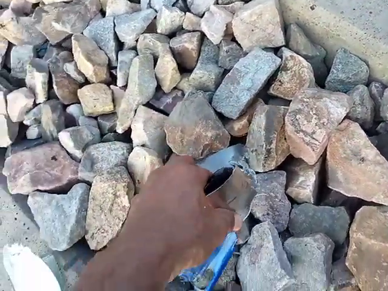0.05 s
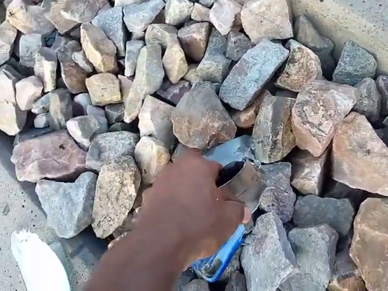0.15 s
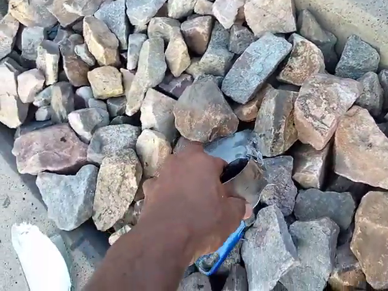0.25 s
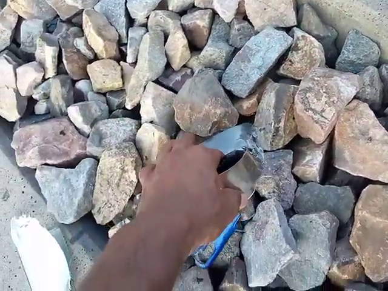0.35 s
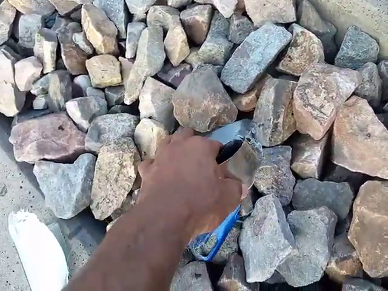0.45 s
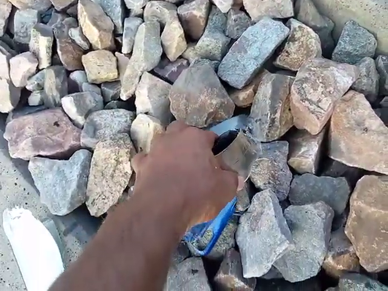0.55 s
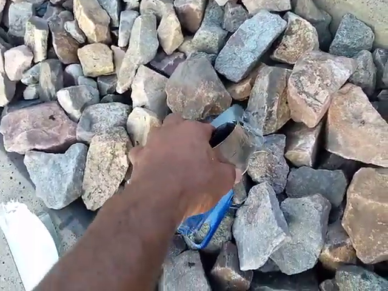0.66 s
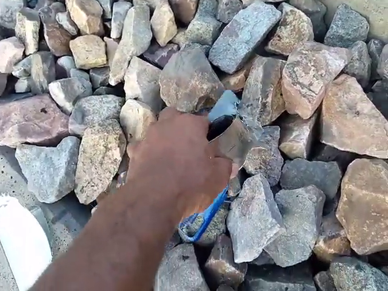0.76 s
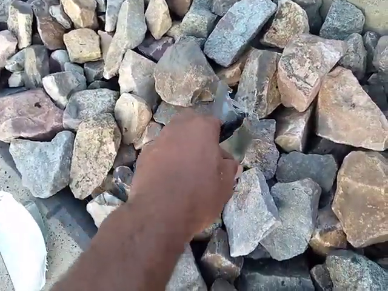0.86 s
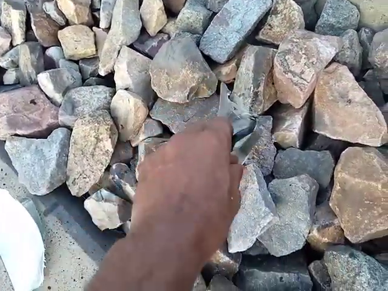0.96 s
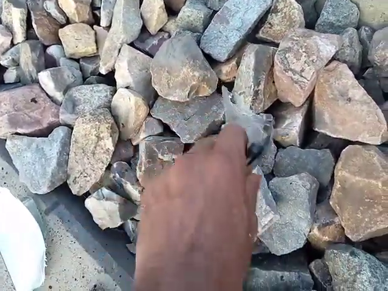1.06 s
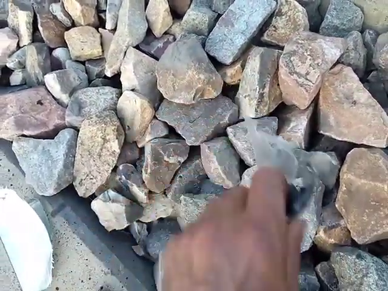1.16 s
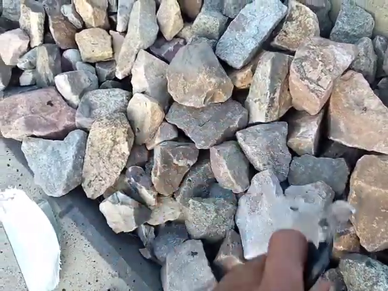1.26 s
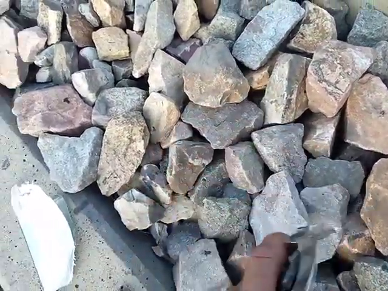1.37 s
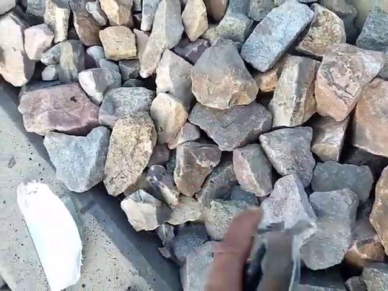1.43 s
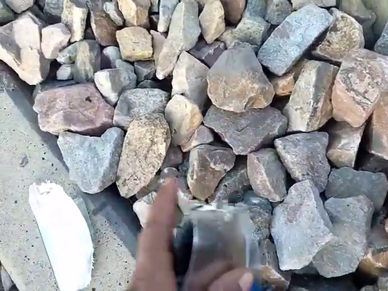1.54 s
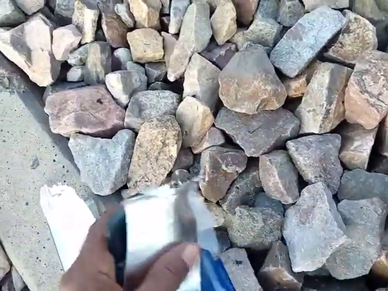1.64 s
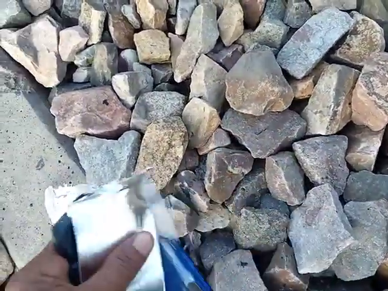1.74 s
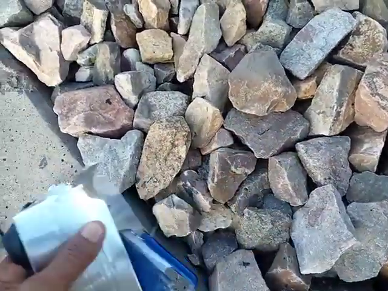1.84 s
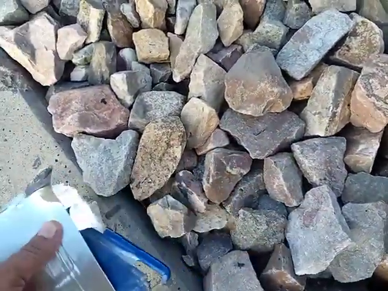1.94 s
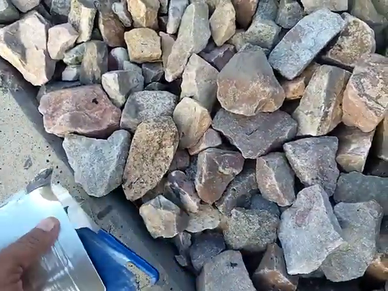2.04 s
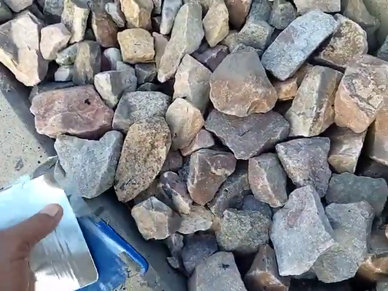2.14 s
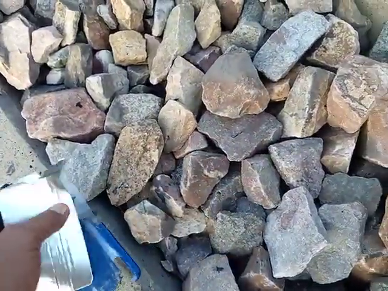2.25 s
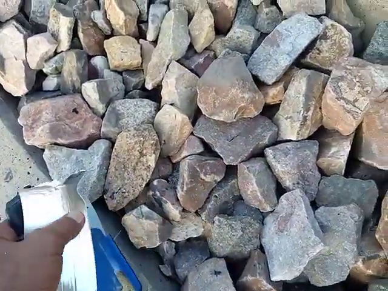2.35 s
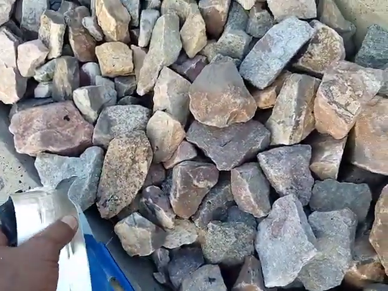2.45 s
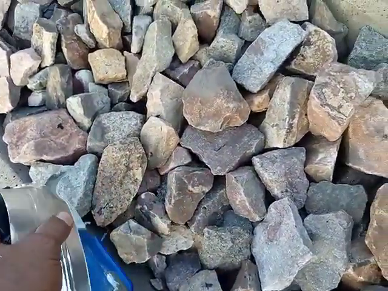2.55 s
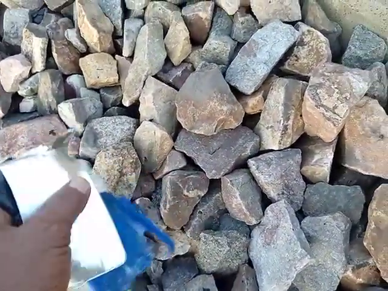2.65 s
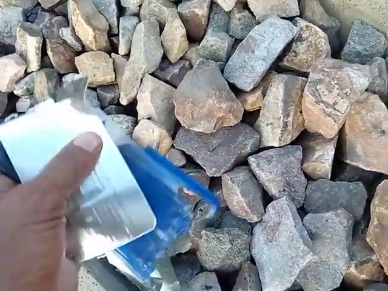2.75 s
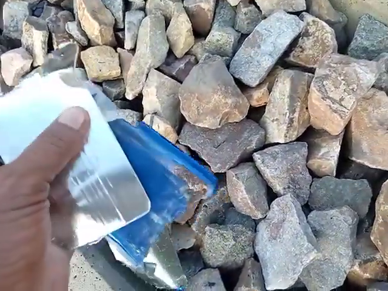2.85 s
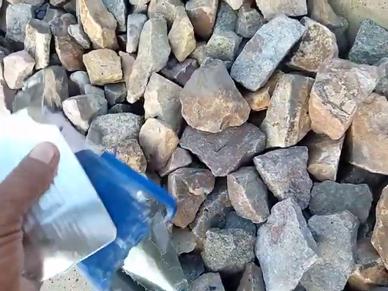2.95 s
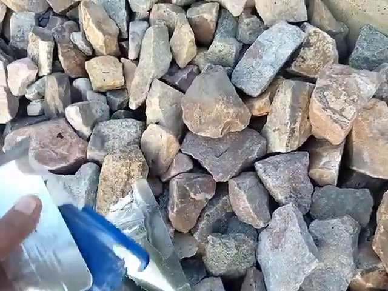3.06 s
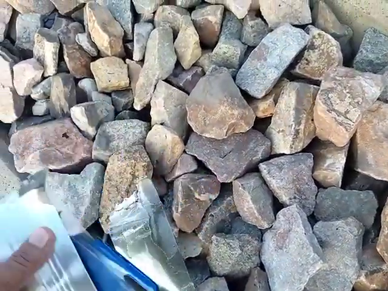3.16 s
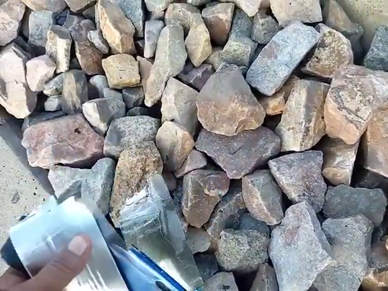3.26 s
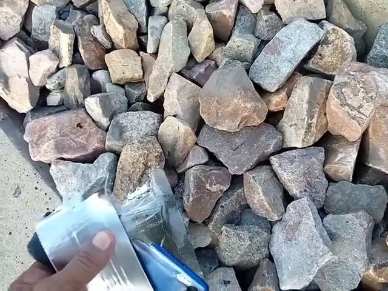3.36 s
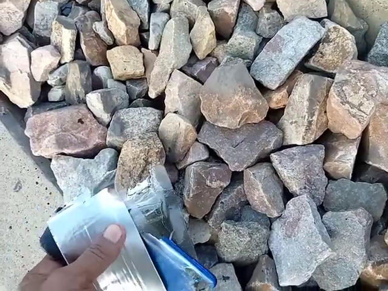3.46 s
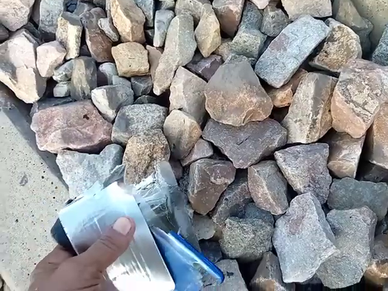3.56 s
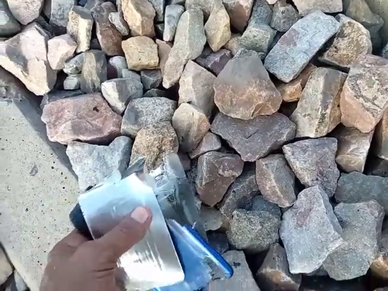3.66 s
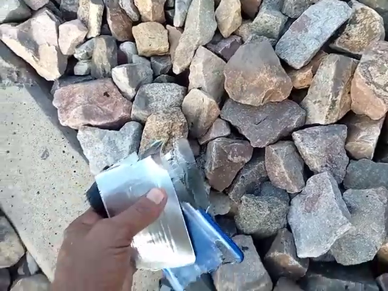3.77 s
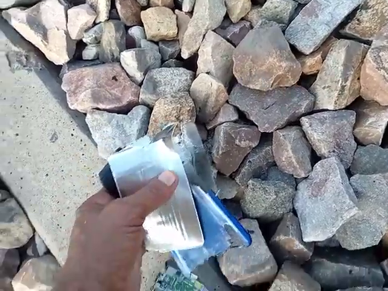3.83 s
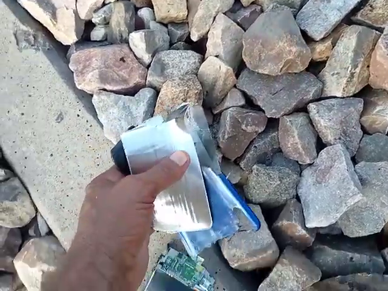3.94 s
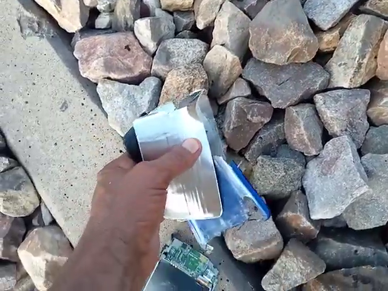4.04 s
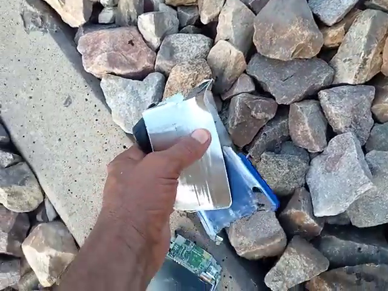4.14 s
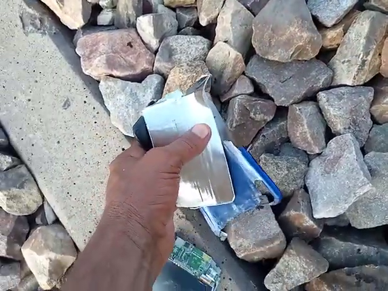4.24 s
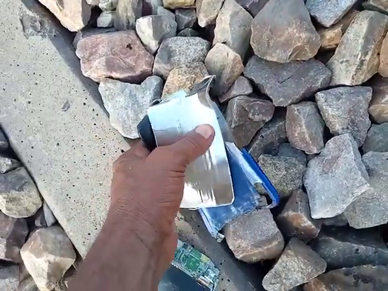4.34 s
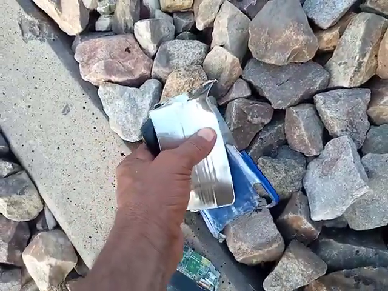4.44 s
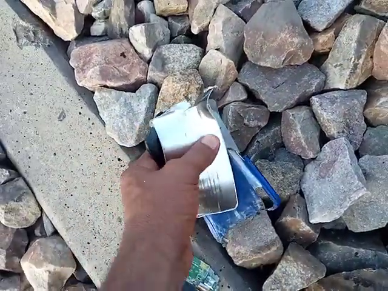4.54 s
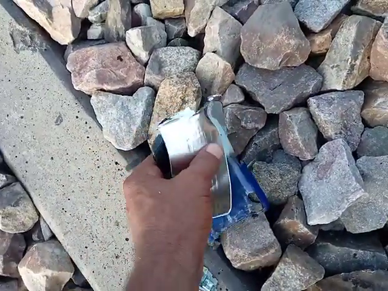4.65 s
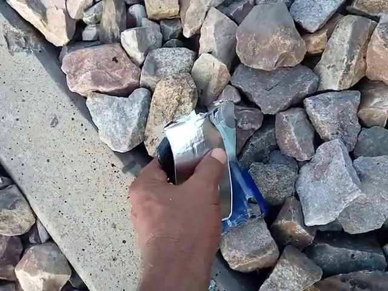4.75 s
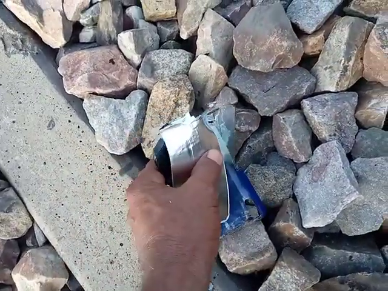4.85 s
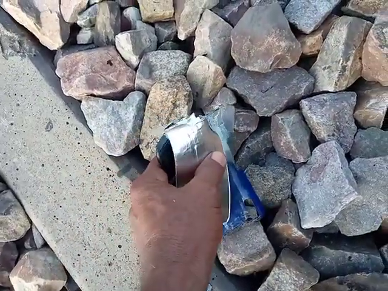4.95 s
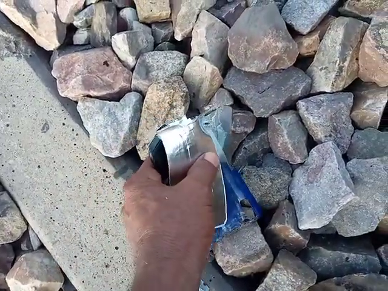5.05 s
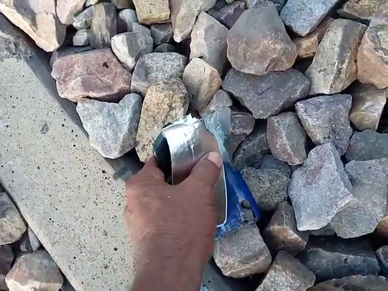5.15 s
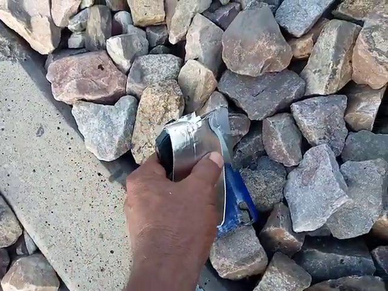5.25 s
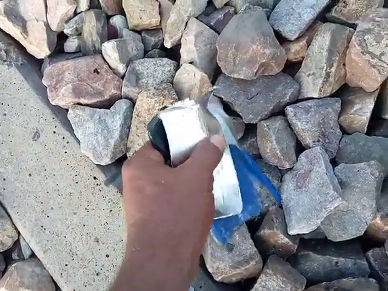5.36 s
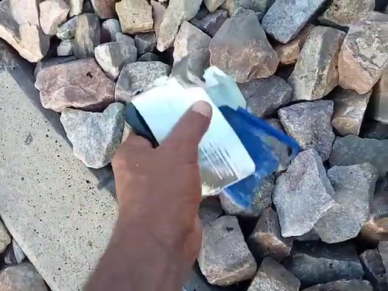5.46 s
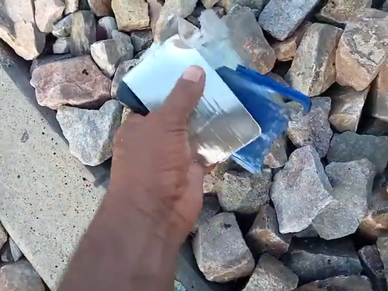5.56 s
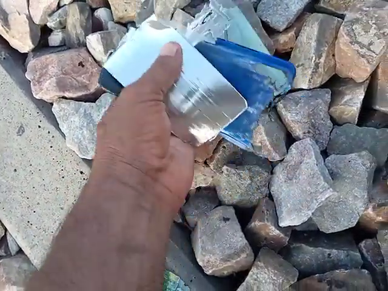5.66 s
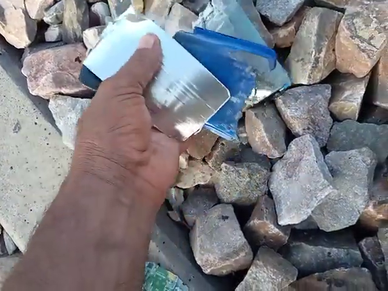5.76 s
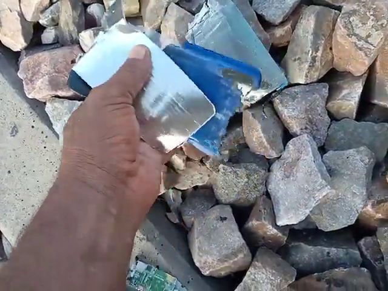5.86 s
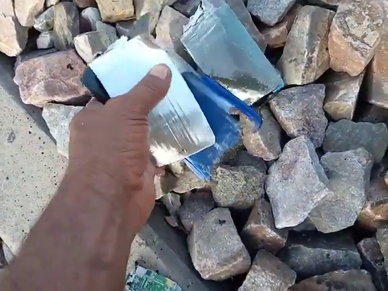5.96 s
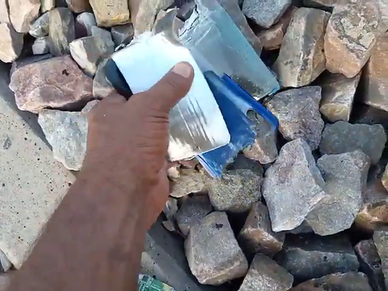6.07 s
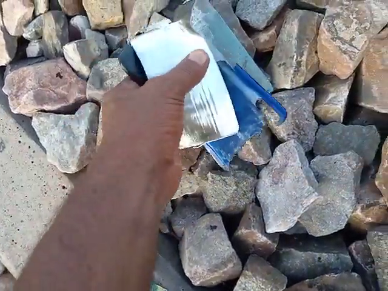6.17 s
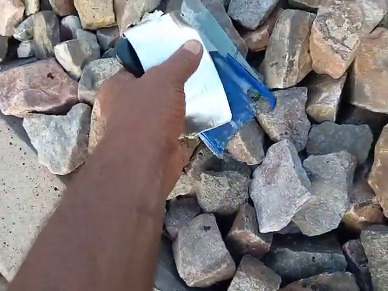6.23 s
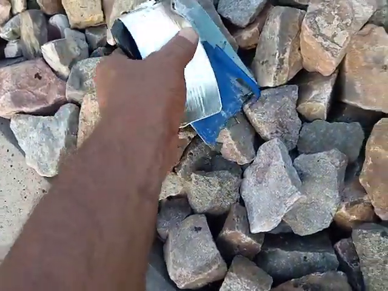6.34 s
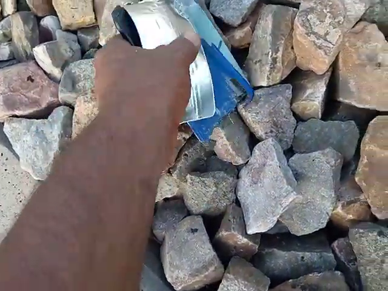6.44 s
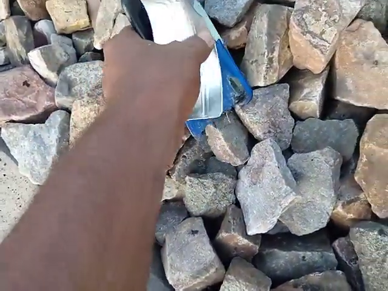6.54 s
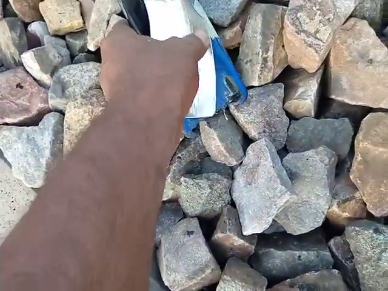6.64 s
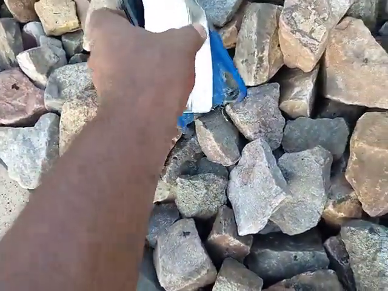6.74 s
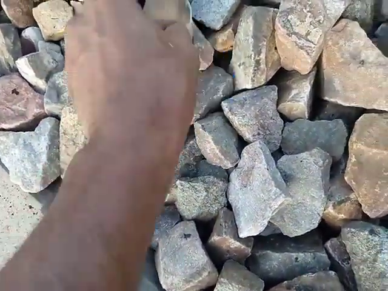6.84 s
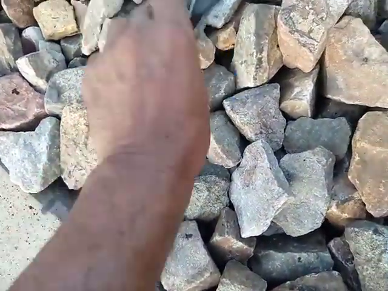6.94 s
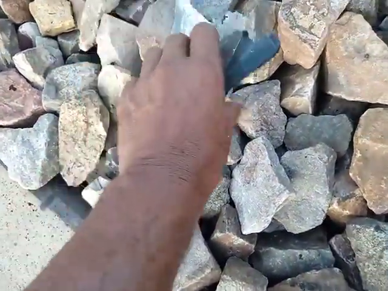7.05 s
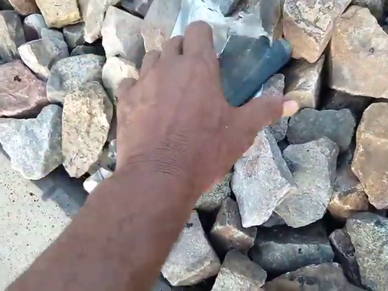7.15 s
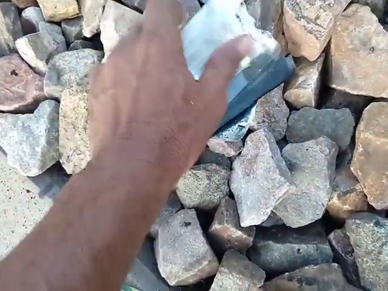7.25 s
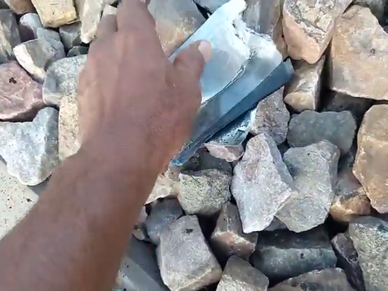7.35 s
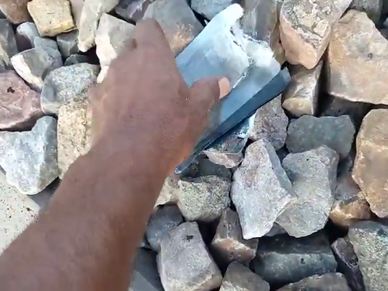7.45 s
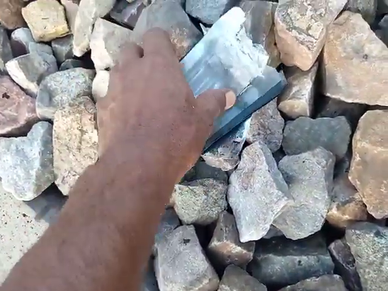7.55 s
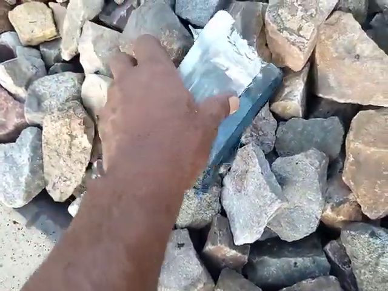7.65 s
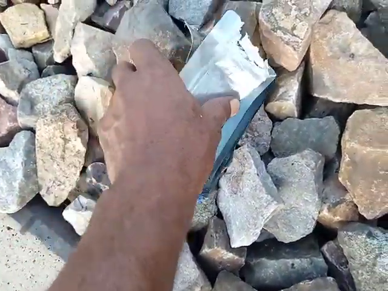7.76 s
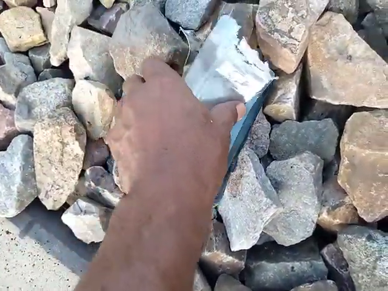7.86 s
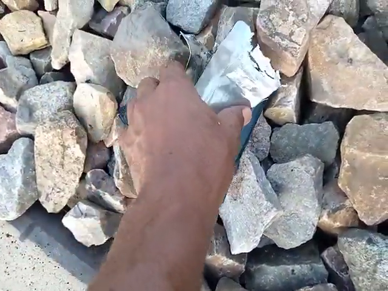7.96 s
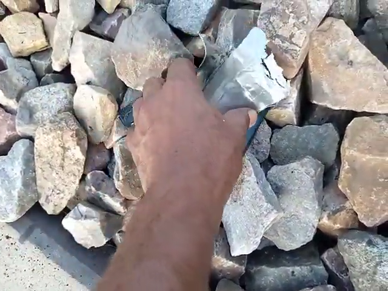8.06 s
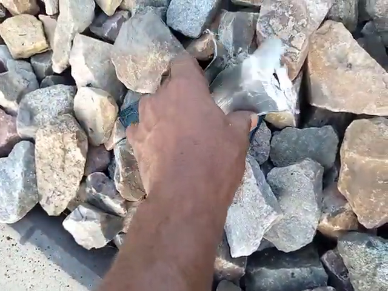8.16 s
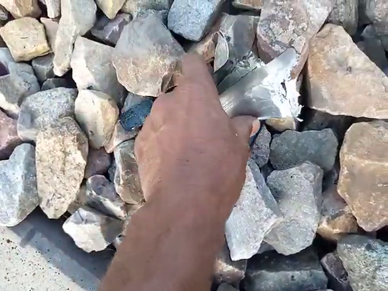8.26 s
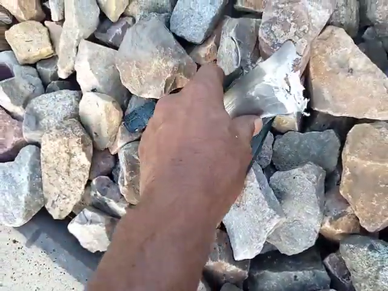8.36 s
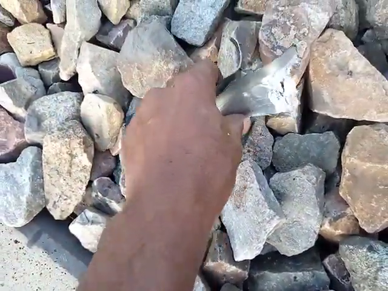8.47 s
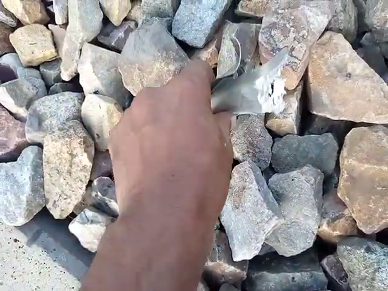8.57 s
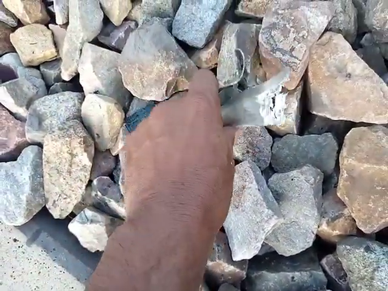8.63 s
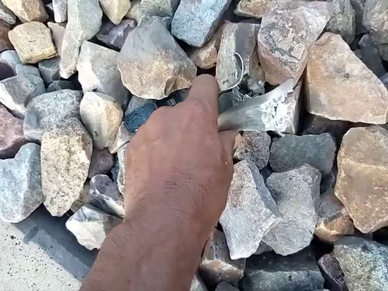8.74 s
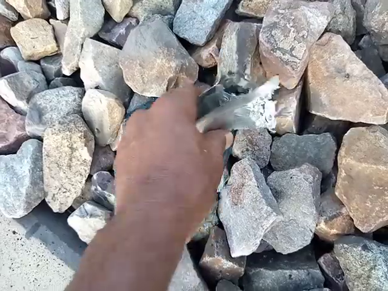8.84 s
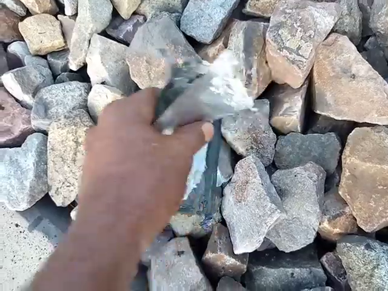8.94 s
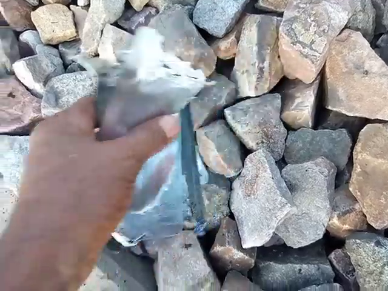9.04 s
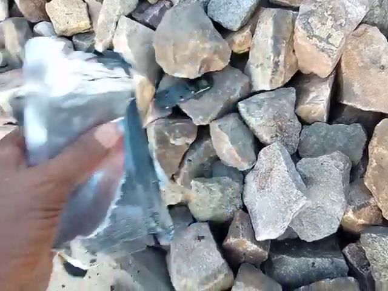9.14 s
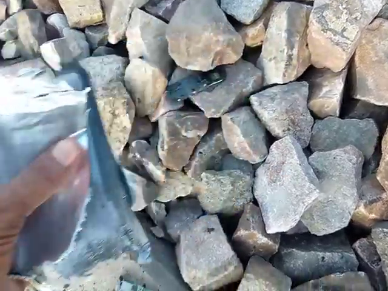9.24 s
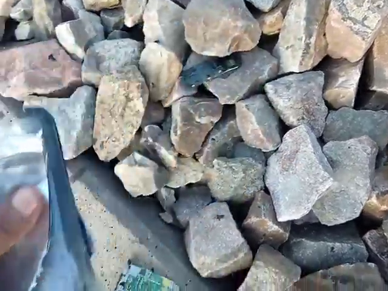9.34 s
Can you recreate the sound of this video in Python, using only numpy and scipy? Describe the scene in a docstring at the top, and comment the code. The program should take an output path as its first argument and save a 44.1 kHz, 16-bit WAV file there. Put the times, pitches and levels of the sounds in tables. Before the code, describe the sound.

Very close to the microphone, a hand picks crushed phone pieces from track stones. Sharp metallic clicks and short ringing scrapes start sparsely, cluster around two and a half seconds, then thin out with a few dull thuds. After seven seconds crumpled foil crackles brighter and busier. Outdoors behind it, insects hiss and buzz, a hoarse bird calls far off, and light wind rumbles.

```python
"""Beside a railway track: a hand gathers a crushed phone from the ballast, close to the microphone.
Its casing, then a crumpled foil sheet, click and scrape: stick-slip impulses ring resonant metal modes.
Low thuds are decaying sines; faint ticks are small versions of the clicks.
Behind them a chorus of insects hisses as banded noise, and two nearer kinds buzz as pulsed, raspy tones.
Farther off a bird calls in fluttering noise, over open air and wind rumbling on the microphone."""
import sys
import numpy as np
from scipy import signal
from scipy.fft import rfft, irfft, next_fast_len
from scipy.io import wavfile
from scipy.ndimage import uniform_filter1d, map_coordinates

SR = 44100
rng = np.random.default_rng(int(sys.argv[2]) if len(sys.argv) > 2 else 0)


def output_pcm(signal):
    """Save a mono or channel-first signal as 16-bit PCM at the path in sys.argv[1].

    Samples are clipped to [-1, 1] before scaling.
    """
    pcm = np.clip(np.atleast_2d(signal).T, -1, 1) * 32767
    wavfile.write(sys.argv[1], SR, np.round(pcm).astype(np.int16))


N = 414540
TIME = np.arange(N) / SR
FOIL_FROM_S = 7.0  # the hand moves from the casing to the foil
LEAD_IN_S = 0.025  # time kept for the graze before each snap
BODY_BELOW_HZ = 1370  # a piece pressed on stone gains body below this
# force: firm contacts are brighter, light ones leave a purer ring
FIRM_DB, TREBLE_PER_DB = -26.5, 1.3


def amp(db):
    """Decibels to gain."""
    return 10 ** (np.asarray(db) / 20)


def unit(x):
    """Scale to rms 1."""
    return x / np.sqrt(np.mean(x ** 2) + 1e-20)


def along(points, hz):
    """Gain of (Hz, dB) points, joined on a log frequency axis."""
    f, db = np.transpose(points)
    return amp(np.interp(np.log(hz + 1), np.log(f + 1), db))


def curves(rows):
    """One value per sample for each column after the time."""
    s, *columns = np.transpose(rows)
    return [np.interp(TIME, s, column) for column in columns]


def gate(start, end, fade):
    """1 between two times, with soft edges."""
    fade_in = np.clip((TIME - start) / fade, 0, 1)
    fade_out = np.clip((end - TIME) / fade, 0, 1)
    return fade_in * fade_out


def wobble(rate):
    """A smooth random curve, rate knots a second."""
    knots = rng.standard_normal(int(N * rate / SR) + 4)
    return map_coordinates(knots, [TIME * rate / SR])


def filtered(x, response):
    """x times a response of frequency."""
    m = next_fast_len(len(x) + 8192)
    spectrum = rfft(x, m) * response(np.fft.rfftfreq(m, 1 / SR))
    return irfft(spectrum, m)[:len(x)]


def coloured(x, gain, size=2048):
    """Causal (minimum-phase) colouring: nothing sounds before the contact."""
    log_gain = np.log(np.maximum(gain(np.fft.rfftfreq(size, 1 / SR)), 1e-6))
    cepstrum = irfft(log_gain)
    # folding the cepstrum onto positive time makes the response causal
    cepstrum[1:size // 2] *= 2
    cepstrum[size // 2 + 1:] = 0
    impulse_response = irfft(np.exp(rfft(cepstrum)))
    return signal.oaconvolve(x, impulse_response)[:len(x)]


def below(hz, corner_hz, order=4):
    """Share of a frequency that lies under a soft corner."""
    return 1 / (1 + (hz / corner_hz) ** order)


def resonances(modes, hz):
    """Power response of (Hz, width Hz, dB) modes."""
    f, width, db = np.transpose(modes)[:, :, None]
    return np.sum(amp(db) ** 2 / (1 + (2 * (hz - f) / width) ** 2), axis=0)


def noise(gain):
    """Noise of rms 1 with a given colour."""
    return unit(filtered(rng.standard_normal(N), gain))


def slips(size, rate, spread_db):
    """Tiny stick-slip impulses at random times, a few much bigger than the rest."""
    happens = rng.random(size) < rate / SR
    sign = rng.choice([-1, 1], size)
    strength = amp(spread_db * np.minimum(rng.exponential(size=size), 4))
    return unit(happens * sign * strength)


def add(track, sound, s):
    """Mix a sound in at a time."""
    part = track[max(round(s * SR), 0):][:len(sound)]
    part += sound[:len(part)]


# colour of the open air around the track: f/Hz, relative level per Hz/dB
AIR_COLOUR = [(100, -7.5), (300, -12.5), (600, -16), (1000, -24), (2000, -14.5), (2700, -8.5), (3800, -18),
              (8000, -48.5), (15000, -51)]


def open_air():
    """Broad noise whose level drifts as the breeze comes and goes."""
    level_db = -74.5 + 3.5 * wobble(3)
    return amp(level_db) * noise(lambda hz: along(AIR_COLOUR, hz))


# colour of wind on the microphone: f/Hz, relative level per Hz/dB
RUMBLE_COLOUR = [(20, -43), (40, -11), (65, 3), (150, -1), (300, -28.5), (900, -62)]
# strength of that wind: t/s, level before the wind gain/dB
WIND = [(0.0, -73.5), (2.8, -78), (2.93, -68.5), (2.98, -80), (5.37, -73.5), (5.5, -67), (5.6, -87),
        (5.71, -60), (5.76, -77), (7.62, -76), (7.7, -63), (7.8, -78), (7.91, -70), (8.67, -77),
        (8.72, -69.5), (9.4, -75.5)]


def wind():
    """A light wind pushes on the microphone: low noise with uneven strength."""
    wind_gain_db = 1.25
    rumble = noise(lambda hz: along(RUMBLE_COLOUR, hz)) * amp(3.5 * wobble(15))
    return amp(curves(WIND)[0] + wind_gain_db) * unit(rumble)


# colour of the broad chorus: f/Hz, relative level per Hz/dB
CHORUS_COLOUR = [(3900, -42), (4300, -17.5), (4600, -3.5), (5100, -0.5), (5800, -2.5), (6100, -10.5),
                 (6500, -20), (7100, -31), (8000, -56)]
# background insects: t/s, broad chorus level before its gain/dB, shrill band level before its gain/dB
INSECTS = [(0.0, -68.5, -70), (2.01, -72, -73.5), (2.45, -66.5, -68.5), (2.64, -57, -55), (3.03, -67, -69),
           (5.4, -69, -72), (7.15, -67, -71), (7.41, -75, -73), (8.31, -75.5, -76.5), (8.7, -70.5, -84.5)]


def insect_chorus():
    """Two kinds of insects sing together: a broad hiss and a narrow, flickering shrill band."""
    chorus_gain_db, shrill_gain_db = 1.5, -1
    chorus_db, shrill_db = curves(INSECTS)
    chorus = amp(chorus_db + chorus_gain_db) * noise(lambda hz: along(CHORUS_COLOUR, hz))
    shrill_band = noise(lambda hz: below(np.abs(hz - 5650), 150, order=2))
    shrill = amp(shrill_db + shrill_gain_db + 3.7 * wobble(60)) * shrill_band
    return chorus + shrill


# resonant colour of the bird's throat: f/Hz, relative level per Hz/dB
CALL_COLOUR = [(2300, -55), (2700, -4.5), (2950, 10), (3450, -12), (3800, 1), (4400, -18.5), (5500, -65)]
# hoarse calls from a distance: t/s, length/s, level/dB
BIRD_CALLS = [(1.348, 0.16, -58), (3.708, 0.19, -53), (4.115, 0.278, -68.5), (6.21, 0.15, -56)]


def bird():
    """A distant bird: hoarse, fluttering noise shaped by a narrow throat resonance."""
    level = sum(amp(db) * gate(s, s + length, fade=0.045) for s, length, db in BIRD_CALLS)
    voice = noise(lambda hz: along(CALL_COLOUR, hz)) * amp(1.5 * wobble(150))
    return level * unit(voice)


# nearer insects: start t/s, end t/s, level/dB, tone f/Hz, mean pulse rate/Hz,
# pulse sharpness (exponent), rasp against the tone/dB
BUZZES = [(5.394, 7.253, -68.5, 5054, 92, 0.47, 1), (7.298, 8.566, -62, 5476, 51.8, 1.5, -1),
          (8.823, 9.42, -62.5, 5091, 78, 0.28, 2)]


def buzzes():
    """The songs of the nearer insects."""
    return sum(buzz(*row) for row in BUZZES)


def buzz(start, end, db, tone_hz, pulse_hz, sharpness, rasp_db):
    """A near insect: pulses at a wavering rate swell an unsteady tone and a rasp around it."""
    beat = np.cumsum(pulse_hz * (1 + 0.023 * wobble(5))) / SR
    pulses = np.abs(np.sin(np.pi * beat)) ** sharpness
    phase = 2 * np.pi * tone_hz * TIME + wobble(pulse_hz)
    rasp = noise(lambda hz: below(np.abs(hz - tone_hz), 180, order=2))
    song = pulses * (unit(np.sin(phase)) + amp(rasp_db) * rasp)
    return amp(db) * gate(start, end, fade=0.012) * unit(song)


# range in which the struck spot of a tick rings: lowest f/Hz, highest f/Hz
SPOT_HZ = (1106, 4040)


def ticks(count=70):
    """The loose pieces tick faintly against each other at random times."""
    weakest_db, range_db = -61.5, 9
    out = np.zeros(N)
    for s, force, spot in rng.random((count, 3)) * [N / SR, 1, 1]:
        ring_hz = np.interp(spot, [0, 1], SPOT_HZ)
        add(out, contact(s, weakest_db + range_db * force, 0, ring_hz), s)
    return out


# dull thuds as the thumb bends the casing: t/s, level/dB, f/Hz
THUDS = [(4.692, -48.5, 328), (4.742, -54, 400), (4.774, -55, 326)]


def thuds():
    """The casing gives under the thumb with a low, hollow, decaying note."""
    t60_s, rise_s = 0.12, 0.0018
    out, t = np.zeros(N), np.arange(SR // 4) / SR
    for s, db, hz in THUDS:
        envelope = amp(db - 60 * t / t60_s) * (1 - np.exp(-t / rise_s))
        add(out, envelope * np.sqrt(2) * np.sin(2 * np.pi * hz * t), s)
    return out


# modes of the phone casing: f/Hz, width/Hz, relative level/dB
CASING_MODES = [(1000, 47, -7.5), (1390, 55, -6), (2090, 100, -12), (2711, 100, 0), (3918, 94, -3.5),
                (3840, 64, -11), (4360, 15, -17)]
# modes of the crumpled foil: f/Hz, width/Hz, relative level/dB
FOIL_MODES = [(1204, 21, 2.5), (1420, 29, -13.5), (2100, 40, -11), (2675, 60, 0), (3060, 29, 1.5),
              (3475, 50, 3.5), (3830, 51, 0.5), (4000, 39, -1.5), (4940, 82, 0.5)]


def piece(s, hz, own_db, spot_db, width_hz, count=12):
    """The held piece's own modes, plus chance ones: crumpled metal rings differently at every spot."""
    own = resonances(CASING_MODES if s < FOIL_FROM_S else FOIL_MODES, hz)
    spot_hz = rng.uniform(750, 4500, count)
    spot_width_hz = width_hz * rng.uniform(0.5, 1.5, count)
    spot = np.transpose([spot_hz, spot_width_hz, rng.normal(spot_db, 4, count)])
    return np.sqrt(1 + amp(own_db) ** 2 * own + resonances(spot, hz))


def main_mode(s):
    """Pitch in Hz at which the held piece squeals: casing first, then foil."""
    return 2809 if s < FOIL_FROM_S else 3122


def brightness(db, hz):
    """Firmer contacts excite more treble, lighter ones less."""
    treble_db = np.clip(TREBLE_PER_DB * (db - FIRM_DB), -12, 3)
    return amp(treble_db * (1 - below(hz, 4100, order=24)))


# colour of a crack on stone: f/Hz, relative level per Hz/dB
CRACK_COLOUR = [(60, -26.5), (200, -15.5), (400, -6.5), (550, -10.5), (720, -7.5), (1100, -8.5),
                (2000, -0.5), (3000, -2), (4200, -8), (5300, -13.5), (6300, -34), (8000, -46), (10500, -59),
                (15000, -42.5)]


def contact(s, db, body_db, ring_hz, size=9000):
    """One click: edges graze, snap together, chatter, and the struck spot rings."""
    graze_s, graze_db = 0.004, -9.5  # swell time and level before the snap
    snap_size = 5  # added to the chatter, whose impulses start at rms 1
    casing_t60_s, foil_t60_s = 0.066, 0.079
    # light touches leave a purer ring; pressing the piece down (more body) damps it
    ring_db, ring_per_db, ring_per_body_db = -3.5, -0.34, -0.35
    peak_over_rms_db = 6

    t = np.arange(size) / SR - LEAD_IN_S
    after = np.maximum(t, 0)
    decay = amp(-60 * after / (casing_t60_s if s < FOIL_FROM_S else foil_t60_s))
    graze = amp(graze_db) * np.exp(np.minimum(t, 0) / graze_s)
    chatter = slips(size, rate=6000, spread_db=3) * np.where(t < 0, graze, decay)
    chatter[round(LEAD_IN_S * SR)] += snap_size

    def colour(hz):
        body = amp(body_db * below(hz, BODY_BELOW_HZ))
        ringing = piece(s, hz, own_db=12.5, spot_db=11, width_hz=68.5)
        return along(CRACK_COLOUR, hz) * body * ringing * brightness(db, hz)

    crack = unit(coloured(chatter, colour))
    note = unit(np.sin(2 * np.pi * ring_hz * after) * decay * (1 - np.exp(-after / 0.00024)))
    purity_db = min(ring_db + ring_per_db * (db - FIRM_DB), 0)
    click = crack + amp(purity_db + ring_per_body_db * body_db) * note
    # the loudest 3 ms set the level
    loudest_rms = np.sqrt(np.max(uniform_filter1d(click ** 2, size=128)))
    return amp(db - peak_over_rms_db) * click / loudest_rms


def catches():
    """Along each stroke the edge snags on the stone and snaps free, ringing near the main mode."""
    catches_per_s = 30
    over_stroke_db, spread_db = 8, 2  # click level above the stroke's level
    detune_share = 0.07  # of the main mode's pitch
    out = np.zeros(N)
    for s, length, db, body_db in STROKES:
        count = round(length * catches_per_s)
        for k in range(count):
            force, detune = rng.standard_normal(2)
            click_db = db + over_stroke_db + spread_db * force
            ring_hz = main_mode(s) * (1 + detune_share * detune)
            click = contact(s, click_db, body_db, ring_hz)
            add(out, click, s + length * (k + rng.random()) / count - LEAD_IN_S)
    return out


# low bending mode heard in the squeal: f/Hz, width/Hz, level against the main mode/dB
BENDING_MODE = (950, 80, -11)
# colour of sliding on stone: f/Hz, relative level per Hz/dB
SCRAPE_COLOUR = [(100, -31), (350, -6), (550, -11.5), (750, -12.5), (1300, -7), (3000, -5.5), (4200, -6.5),
                 (5300, -16), (6500, -38.5), (10000, -60), (15000, -49.5)]
# sliding strokes close to the microphone: t/s, length/s, level at full pressure/dB, body/dB
STROKES = [(0.344, 0.13, -53.5, 1.5), (0.49, 0.085, -40, -13), (0.648, 0.03, -45, -28),
           (0.685, 0.23, -46.5, -7), (1.901, 0.059, -57, 7), (2.003, 0.05, -61.5, 3.5),
           (2.323, 0.05, -43, 1), (2.336, 0.165, -39, -5), (2.542, 0.07, -46.5, -8),
           (2.646, 0.054, -36, 1.5), (3.223, 0.063, -52, 1), (4.702, 0.1, -58.5, 5), (4.9, 0.33, -63.5, 2),
           (5.309, 0.071, -47.5, -3), (5.375, 0.063, -54.5, -0.5), (5.547, 0.055, -59, 5),
           (5.735, 0.079, -54, -5), (6.213, 0.025, -44.5, 4.5), (6.385, 0.25, -51, 0),
           (6.661, 0.31, -56.5, 11.5), (7.035, 0.077, -37.5, -1), (7.138, 0.11, -46.5, 6),
           (7.234, 0.075, -28.5, 2), (7.292, 0.055, -36.5, -3), (7.35, 0.12, -51, -6),
           (7.567, 0.27, -51, -7), (7.63, 0.088, -44.5, -1.5), (7.884, 0.074, -51, -3),
           (8.046, 0.05, -48.5, 0), (8.099, 0.21, -60.5, -16), (8.41, 0.16, -59, 2.5),
           (8.687, 0.076, -44.5, 3.5), (8.732, 0.044, -35, 7), (8.862, 0.044, -43.5, 0)]


def scraping(size=20000):
    """A piece dragged over stone judders, and its stick-slips set it ringing and squealing."""
    # pressure rises over a share of the stroke, holds and lets go
    press_share, let_go_t60_s = 0.16, 0.11
    squeal_db, squeal_per_body_db = -6.5, -0.7  # pressing down damps the squeal
    wander_per_s = 4  # the touching spot moves on
    # fast and slow changes of grip
    grip = amp(2.8 * wobble(100) + 1.5 * wobble(28))
    out, t = np.zeros(N), np.arange(size) / SR
    for s, length, db, body_db in STROKES:
        press = np.clip(t / (press_share * length), 0, 1)
        let_go = amp(-60 * np.maximum(t - length + 0.024, 0) / let_go_t60_s)
        pressure = press * let_go
        judder = np.resize(grip[round(s * SR):], size)
        drive = slips(size, rate=900, spread_db=3) * pressure * judder

        def colour(hz):
            body = amp(body_db * below(hz, BODY_BELOW_HZ, order=8))
            ringing = piece(s, hz, own_db=13, spot_db=16, width_hz=42)
            return along(SCRAPE_COLOUR, hz) * body * ringing * brightness(db + 8.5, hz)

        # the touching spot wanders, so two chance sets of resonances take turns
        here = unit(coloured(drive, colour))
        there = unit(coloured(drive, colour))
        turn = 2 * np.pi * (wander_per_s * t + rng.random())
        rasp = unit(here * np.cos(turn) ** 2 + there * np.sin(turn) ** 2)
        squeal_modes = [(main_mode(s), 130, 0), BENDING_MODE]
        squeal = unit(coloured(drive, lambda hz: resonances(squeal_modes, hz)))
        stroke = unit(rasp + amp(squeal_db + squeal_per_body_db * body_db) * squeal)
        add(out, amp(db) * stroke * np.sqrt(np.mean(pressure ** 2)), s)
    return out


# distinct contacts close to the microphone: snap t/s, nominal peak level/dB, body/dB,
# ring of the struck spot f/Hz
HITS = [(0.048, -18.5, 6.5, 1423), (0.336, -45.5, -15.5, 3700), (0.393, -24.5, -4, 2856),
        (0.5, -27, -27, 2690), (1.266, -26.5, -1, 2930), (1.866, -41.5, -7, 2610), (2.445, -22, -12, 2670),
        (2.523, -25.5, -2.5, 2000), (2.545, -14.5, -14.5, 2758), (2.621, -26.5, -7.5, 2810),
        (2.643, -18.5, -12.5, 2620), (2.662, -17.5, -2, 2783), (2.73, -23, 1.5, 2690),
        (2.798, -33.5, -18, 2800), (2.837, -35.5, -12, 3640), (2.974, -35.5, 3.5, 3340),
        (4.204, -48.5, -6, 2070), (4.412, -40.5, 16, 1505), (4.688, -41, 9, 3890), (5.337, -30, 3, 3620),
        (5.686, -27, 6.5, 1860), (5.736, -28, -3, 3080), (6.222, -28.5, 3.5, 2670), (6.793, -32, -3, 1916),
        (7.035, -23.5, -10, 3370), (7.094, -30.5, 3.5, 2839), (7.232, -15.5, -2, 2763),
        (7.245, -19, -11, 3490), (7.786, -35, -2, 3414), (7.893, -31.5, -14.5, 3216),
        (8.064, -27.5, -4, 3220), (8.148, -38, -18, 2340), (8.164, -32, -1, 2467),
        (8.219, -25.5, -9.5, 3030), (8.458, -38.5, 9, 2194), (8.564, -36.5, 0.5, 2190),
        (8.751, -20, -3, 3050), (8.861, -20.5, 4.5, 2820), (9.158, -39, -16, 1850),
        (9.347, -26.5, -10, 2520)]


def clicks():
    """The distinct contacts of the pieces with each other and the stones."""
    out = np.zeros(N)
    for s, db, body_db, ring_hz in HITS:
        add(out, contact(s, db, body_db, ring_hz), s - LEAD_IN_S)
    return out


def scene():
    """The handled pieces close by, in front of the insects, bird, air and wind."""
    background = open_air() + wind() + insect_chorus() + bird() + buzzes()
    handling = ticks() + thuds() + catches() + scraping() + clicks()
    return (background + handling)[None]


def record(dry):
    """The recorder keeps nothing above its band limit."""
    top_hz = 15750
    return filtered(dry[0], lambda hz: hz < top_hz)[None]


dry = scene()
out = record(dry)
output_pcm(out)
```